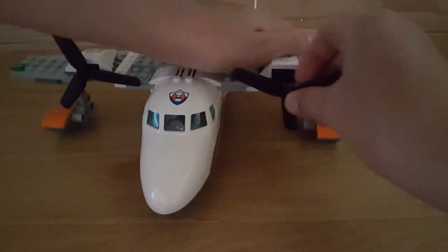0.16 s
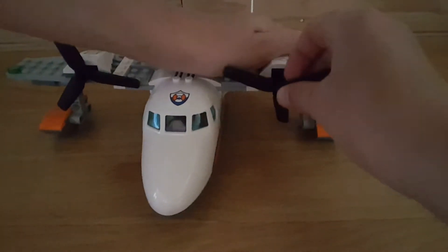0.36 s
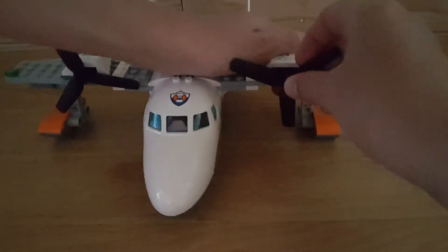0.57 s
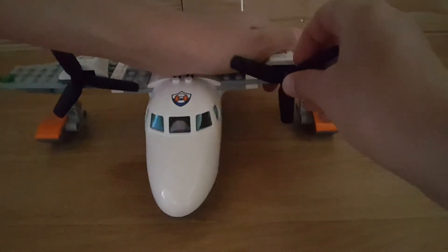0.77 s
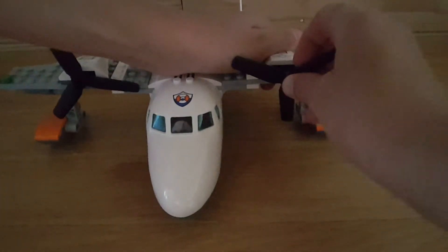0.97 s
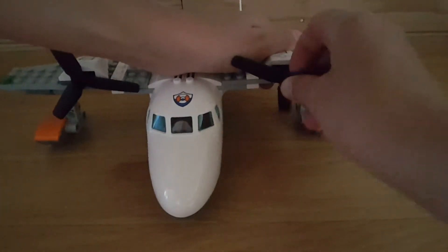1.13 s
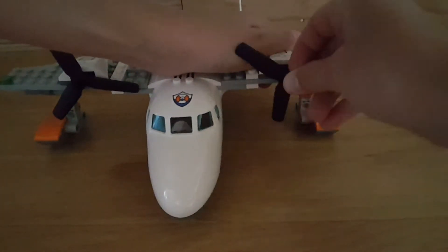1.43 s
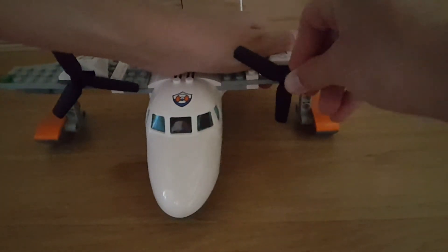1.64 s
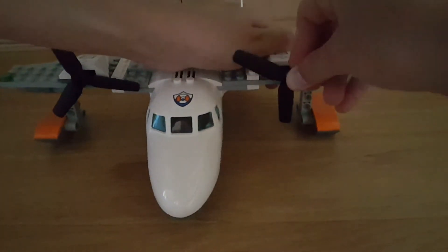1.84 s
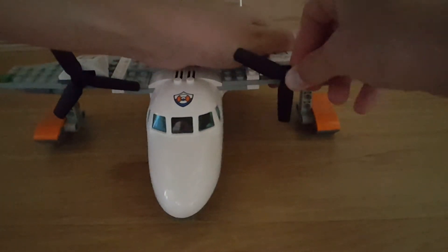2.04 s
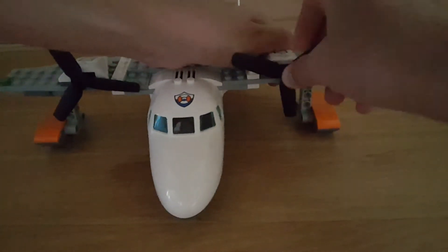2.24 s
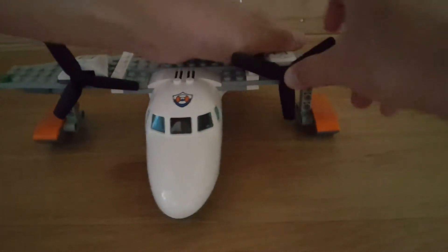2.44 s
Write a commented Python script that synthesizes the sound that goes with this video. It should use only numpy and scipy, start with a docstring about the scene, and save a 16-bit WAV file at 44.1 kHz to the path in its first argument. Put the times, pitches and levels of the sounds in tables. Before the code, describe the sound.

Plastic clicks and light taps as a propeller is pressed onto a toy-brick aeroplane.

```python
"""Pressing a propeller onto a toy aeroplane

A plastic propeller is pressed onto a toy-brick aeroplane on a wooden table in a small room.
Its pin creaks and snaps home, bricks shift and tap under the fingers, and a small part ticks once.
Each contact is a force pulse that rings the hollow model, its bricks, the table top and the room."""
import sys
import numpy as np
from scipy import signal
from scipy.fft import rfft, irfft
from scipy.io import wavfile

SR = 44100
rng = np.random.default_rng(int(sys.argv[2]) if len(sys.argv) > 2 else 0)


def generate_wav(signal):
    """Clip the signal to [-1, 1] and save it as 16-bit WAV at the path in sys.argv[1]."""
    frames = np.transpose(np.atleast_2d(signal))
    scaled = np.clip(frames, -1, 1) * 32767
    pcm = np.round(scaled).astype(np.int16)
    wavfile.write(sys.argv[1], SR, pcm)


N = 114660


def from_db(db):
    return 10 ** (np.asarray(db) / 20)


def at_hz(rows, hz, column=1):
    """A table's column, interpolated over log frequency."""
    rows = np.array(rows)
    return np.interp(np.log(np.maximum(hz, 1)), np.log(rows[:, 0]), rows[:, column])


def add(out, start_s, sound):
    start = int(start_s * SR)
    n = min(sound.shape[-1], N - start)
    out[..., start:start + n] += sound[..., :n]


def pulse(spectrum, size=4096):
    """Minimum-phase force pulse from (Hz, dB) pairs."""
    gain = from_db(at_hz(spectrum, np.fft.rfftfreq(size, 1 / SR)))
    cepstrum = irfft(np.log(gain))
    cepstrum[1:size // 2] *= 2
    cepstrum[size // 2 + 1:] = 0
    return irfft(np.exp(rfft(cepstrum)))[:size // 2]


def push(response, force):
    """Sound of a force acting on a spot with this impulse response."""
    return signal.fftconvolve(response, force[None], axes=1)


def ringing(modes, size, scatter_rad=0, swell_s=0):
    """Damped resonances; scatter parts their left and right phases."""
    t, out = np.arange(size) / SR, 0
    for hz, width_hz, db in modes:
        phase = scatter_rad * rng.standard_normal((2, 1))
        envelope = from_db(db) * 2 * np.pi * width_hz / SR * np.exp(-np.pi * width_hz * t)
        out = out + envelope * np.cos(2 * np.pi * hz * t + phase)
    return out * (1 - np.exp(-t / (swell_s + 1 / SR)))


# Each row: frequency in Hz, left-right correlation.
CORRELATION = [(100, .97), (300, 0.79), (700, 0.49), (1400, 0.39), (4000, 0), (14000, 0)]

def stereo_noise(n):
    """Spectra of two white noises, alike in the bass, and their frequencies."""
    hz = np.fft.rfftfreq(n, 1 / SR)
    mid, side = rfft(rng.standard_normal((2, n)))
    alike = at_hz(CORRELATION, hz)
    return np.sqrt((1 + alike) / 2) * mid + np.sqrt((1 - alike) / 2) * side * [[1], [-1]], hz


def dying_noise(bands, rise_s, size, count=15):
    """Countless overlapping modes: noise bands swell together, each dying at its own rate."""
    white, hz = stereo_noise(size)
    t, out = np.arange(size) / SR, 0
    centres_hz = np.geomspace(90, 15000, count)
    for centre_hz, pick in zip(centres_hz, np.eye(count)):
        share = np.interp(np.log(hz + 1), np.log(centres_hz), pick) * (hz > 60)
        decay = from_db(-60 * t / at_hz(bands, centre_hz, column=2))
        band = irfft(white * share) * (1 - np.exp(-t / rise_s)) * decay
        energy = np.mean(np.sum(band ** 2, axis=1))
        out = out + band * from_db(at_hz(bands, centre_hz)) * np.sqrt(np.mean(share ** 2) / energy)
    return out


# Each row: frequency in Hz, relative noise density in dB.
AIR_SPECTRUM = [(25, -3.5), (45, -7), (105, 1.5), (150, -4), (230, -10.5), (480, -19), (900, -19.5),
                (1500, -24), (2600, -26), (5000, -33), (9300, -37.5), (15500, -35.5)]

def air(rms_db=-61.5):
    """Steady low rumble of the room under faint hiss."""
    white, hz = stereo_noise(N)
    noise = irfft(white * from_db(at_hz(AIR_SPECTRUM, hz)), N)
    return from_db(rms_db) * noise / np.std(noise)


# Each row: frequency in Hz, gain in dB, T60 in seconds.
ROOM_BANDS = [(99, -15.5, 0.47), (292, -7, 0.33), (796, -10.5, 0.18), (2500, -8, 0.21), (5900, -10.5, 0.23),
              (14000, -8.5, 0.28)]

def room_tail():
    """Impulse response of the small room's reverberation."""
    return dying_noise(ROOM_BANDS, rise_s=0.003, size=16384)


def in_room(sound, room, tail_db):
    """Direct sound plus its reverberation."""
    response = from_db(tail_db) * room
    response[:, 0] += 1
    return signal.fftconvolve(sound, response, axes=1)


# Table top and hollow model. Each row: frequency in Hz, width in Hz, gain in dB.
TABLE_MODES = [(79.4, 8.7, -8), (111.7, 16, 2), (156.7, 9.2, 10), (203.3, 12.7, -0.5), (240.2, 27.7, 4),
               (316.6, 44, 3), (430, 23, -1.5), (472.4, 16, -8.5)]
MODEL_MODES = [(865, 72, 4.5), (1221, 32, 2), (1634, 44, -7), (1880, 28, -6), (2330, 53, -6),
               (2740, 32, -3), (3295, 61, 1), (6430, 1400, -8)]
# Dense ringing of the bricks. Each row: frequency in Hz, gain in dB, T60 in seconds.
BRICK_BANDS = [(100, -14, 0.044), (364, -16, 0.24), (730, -2.5, 0.025), (1970, 1, 0.023), (5960, -2, 0.033),
               (14000, 0, 0.021)]
SWELL_SHARE = 0.2  # modes build up in this share of a contact's rise

def aeroplane(room, rise_s, detune=0, ring_size=4096):
    """Response at one spot: table, model, bricks and room ring; the grip can detune the model."""
    modes = [(hz * np.exp(detune * rng.standard_normal()), width_hz, db)
             for hz, width_hz, db in MODEL_MODES]
    response = ringing(TABLE_MODES, room.shape[1]) + room
    model = ringing(modes, ring_size, scatter_rad=1.43, swell_s=SWELL_SHARE * rise_s)
    bricks = dying_noise(BRICK_BANDS, rise_s, ring_size)
    response[:, :ring_size] += model + bricks
    return response


# Each row: start in seconds, end in seconds, gain in dB, tilt about 1 kHz in dB per decade.
RUBS = [(.143, 0.161, -13.5, 4), (.33, .54, -43.5, -11), (.54, .566, -36.5, 5), (.5655, .571, -21.5, 19),
        (1.50, 1.568, -44, 19), (1.648, 1.685, -31, -1), (1.688, 1.716, -29, -6), (2.39, 2.475, -42, 2),
        (2.475, 2.60, -33.5, 0)]
# Force of one slip. Each row: frequency in Hz, level in dB.
SLIP_SPECTRUM = [(130, 8.5), (300, 0.5), (560, -4.5), (950, 2), (2500, -9), (5000, -19.5), (9000, -36.5)]

def rubs(out, spots, slips_per_s=1100, spread_db=2):
    """Plastic sticks and slips on plastic: quick uneven runs of tiny pushes."""
    for k, (start_s, end_s, gain_db, tilt) in enumerate(RUBS):
        n = int((end_s - start_s) * SR)
        slipping = rng.random(SR)[:n] < slips_per_s / SR
        strength = from_db(spread_db * rng.standard_normal(SR)[:n])
        slip = pulse([(hz, db + tilt * np.log10(hz / 1000)) for hz, db in SLIP_SPECTRUM])
        force = signal.fftconvolve(slipping * strength, slip)
        add(out, start_s, from_db(gain_db) * push(spots[k % len(spots)], force))


# Each row of TAPS: start in seconds, then relative force in dB at each frequency of TAP_HZ.
TAP_HZ = [130, 320, 1150, 3800, 10000]
TAPS = [(0.139, 18.5, -1, -17, -12, -42), (0.1935, 5, -8, -7, -9, -35), (0.36, -9, -12, -22, -45, -54),
        (0.657, -3, -8, -22, -44, -59), (0.704, -18, -14, -20, -39, -50),
        (0.739, -11.5, -16, -23, -48, -55), (0.904, -2, -11, -11, -64, -57),
        (0.929, -5.5, -9.5, -50, -42, -65), (1.049, -17, -12, -11.5, -55, -60),
        (1.068, -3, -9, -25, -52, -64), (1.105, -8, -10, -25, -63, -56),
        (1.12, -4.5, -12, -23.5, -32.5, -56), (1.178, -25, -25, -23, -47, -52),
        (1.223, -1.5, -29, -36, -43, -39), (1.373, -12, -11, -19.5, -66, -67),
        (1.524, -3, -7.5, -9, -36, -49), (1.533, -7.5, -19, -12.5, -43, -47),
        (1.543, -13, -31, -12.5, -38, -47), (1.637, -23, -9, -13, -38, -63), (1.703, 3, 5.5, -15, -40, -45),
        (2.2615, 3.5, -2.5, -12.5, -20, -40), (2.331, 11, -14, -2, -36, -44), (2.342, -1, 0, -21, -19, -51),
        (2.402, -21, -6.5, -16.5, -35, -48), (2.428, 2, -5.5, -20.5, -29, -47),
        (2.507, -10, 3, -14, -38, -56), (2.526, -13, 3, -25, -33, -38), (2.555, -8, -6, -26, -41, -49)]

def taps(out, spots, gain_db=-1.5):
    """Bricks tap and shift under the fingers: one pulse each, on the spots in turn."""
    for k, (start_s, *force_db) in enumerate(TAPS):
        force = pulse(list(zip(TAP_HZ, force_db)))
        add(out, start_s, from_db(gain_db) * push(spots[k % len(spots)], force))


# The loose part. Each row: frequency in Hz, width in Hz, relative gain in dB.
PART_MODES = [(1130, 50, 0), (2100, 230, -1), (3450, 160, -5), (4000, 260, -4), (4760, 350, -4),
              (5830, 150, -4), (7350, 100, -11), (7880, 100, -13), (9880, 240, 4), (12800, 370, -10)]
# Force of its crack. Each row: frequency in Hz, level in dB.
CRACK_SPECTRUM = [(300, -46), (1100, -13), (2000, -13), (3000, -27), (5000, -17), (8000, -39), (15000, -29)]

def tick(out, spot, room, start_s=1.6835, ring_db=-5.5):
    """A small loose part flicks against its seat, rings high and jolts the model."""
    ring = ringing(PART_MODES, 4096, scatter_rad=1.14, swell_s=0.0007)
    add(out, start_s, from_db(ring_db) * in_room(ring, room, tail_db=-20))
    add(out, start_s, push(spot, pulse(CRACK_SPECTRUM)))


# Each row of SNAPS: start in seconds, rise in seconds, room gain in dB,
# then relative force in dB at each frequency of SNAP_HZ.
SNAP_HZ = [130, 290, 560, 930, 1600, 2750, 5200, 10000]
SNAPS = [(0.163, 0.0009, -0.5, 22, 17, 9, 15, 7.5, 10, 0.5, -20.5),
         (0.569, 0.004, -1.5, 11.5, -2, 0.5, -2, 6, -3, -17.5, -22),
         (2.2897, 0.0011, -1, -2, 19, 5, -2, 5, -8, -16, -25),
         (2.293, .0005, -1.5, -4, -11, -10, -14, -12, -5, -9.5, -25),
         (2.4825, .002, 4, -6, -12, -11, -16, -21, -27, -26, -36)]
# One list per snap. Each row: frequency in Hz, width in Hz, gain in dB.
JOINT_MODES = [
    [(880, 51, 4.6), (1826, 26, 8.4), (2493, 60, 7.7), (2894, 85, 2), (3754, 70, 3.7)],
    [(1230, 60, 3), (1621, 29, 5.3), (2720, 38, 6.9)],
    [(329, 68, 2.9), (474.7, 18.5, 6.1), (1246, 40, 8.7), (1376, 30, 3.1), (1720, 130, 5.8), (3285, 90, 8)],
    [(4540, 120, 3), (4950, 110, 7)],
    [(4660, 180, 7.9)],
]

def snaps(out, room, gain_db=1):
    """The pin snaps home: hard pulses ring the aeroplane and the pieces that meet at the joint."""
    for (start_s, rise_s, room_db, *force_db), modes in zip(SNAPS, JOINT_MODES):
        tail = from_db(room_db) * room
        body = aeroplane(tail, rise_s)
        joint = ringing(modes, 4096, scatter_rad=0.78, swell_s=SWELL_SHARE * rise_s)
        joint = in_room(joint, tail, tail_db=-6)[:, :body.shape[1]]
        force = pulse(list(zip(SNAP_HZ, force_db)))
        add(out, start_s, from_db(gain_db) * push(body + joint, force))


# Microphones' gentle treble roll-off above 10 kHz. Each row: frequency in Hz, gain in dB.
MIC_ROLL_OFF = [(10000, 0), (15000, -5.5)]
# Each row: frequency in Hz, left minus right in dB.
BALANCE = [(300, 1), (1300, 0.5), (2500, 1), (5000, -2.5), (10000, 3.5)]

def microphones(contacts, bass_cut_hz=74, right_lag_s=0.00012):
    """Contacts are heard with no deep bass and a softened top; the sides differ in colour and delay."""
    highpass = signal.butter(3, bass_cut_hz, "high", fs=SR, output="sos")
    spectrum = rfft(signal.sosfilt(highpass, contacts))
    hz = np.fft.rfftfreq(N, 1 / SR)
    lag = np.exp(-2j * np.pi * hz * right_lag_s * [[0], [1]])
    colour_db = at_hz(MIC_ROLL_OFF, hz) + at_hz(BALANCE, hz) * [[0.5], [-0.5]]
    return irfft(spectrum * lag * from_db(colour_db), N)


def scene():
    """All contacts in one room, over its still air; the light ones share five spots."""
    contacts = np.zeros((2, N))
    room = room_tail()
    spots = [aeroplane(room, rise_s=0.0013, detune=0.09) for _ in range(5)]
    snaps(contacts, room)
    taps(contacts, spots)
    rubs(contacts, spots)
    tick(contacts, spots[0], room)
    return microphones(contacts) + air()


def record(dry):
    """Steep low-pass at 15.8 kHz."""
    return signal.sosfiltfilt(signal.ellip(10, 0.05, 60, 15800, fs=SR, output="sos"), dry)


dry = scene()
out = record(dry)
generate_wav(out)
```